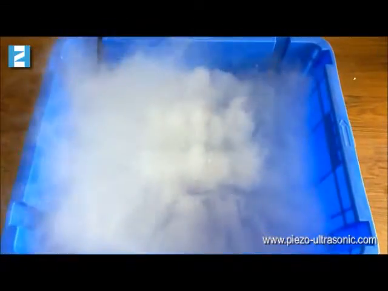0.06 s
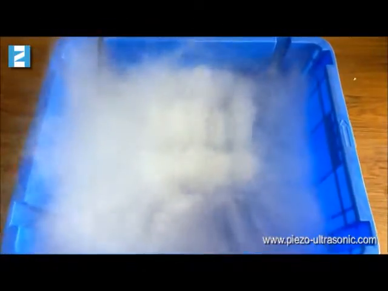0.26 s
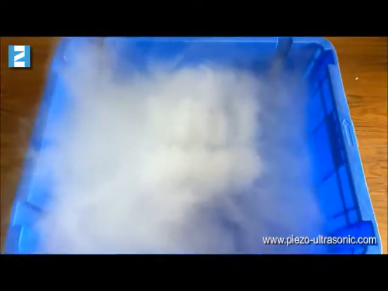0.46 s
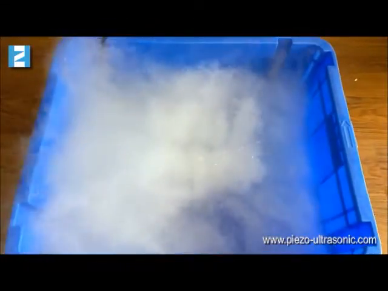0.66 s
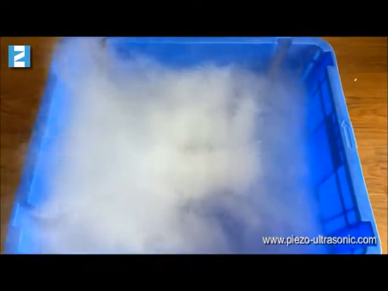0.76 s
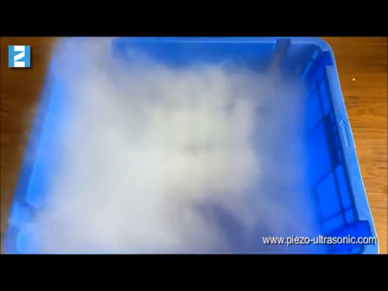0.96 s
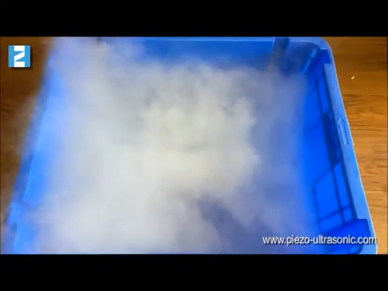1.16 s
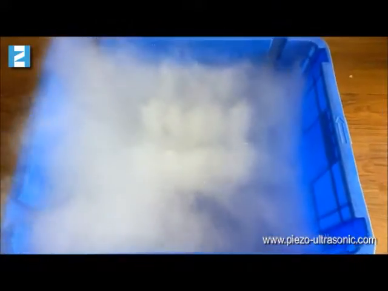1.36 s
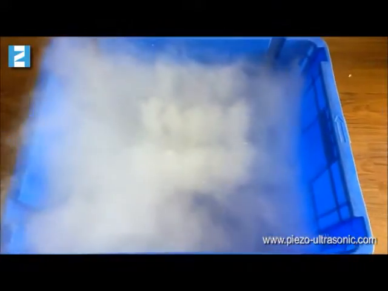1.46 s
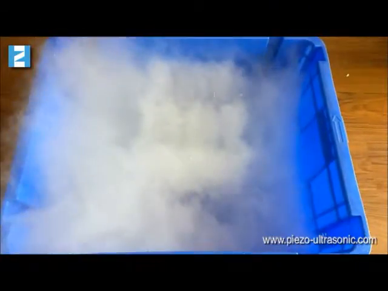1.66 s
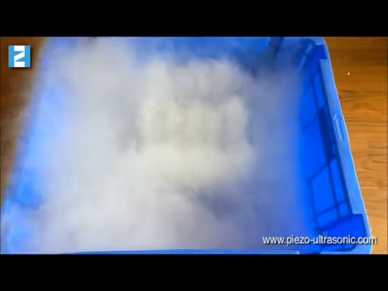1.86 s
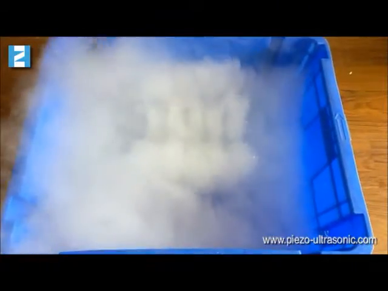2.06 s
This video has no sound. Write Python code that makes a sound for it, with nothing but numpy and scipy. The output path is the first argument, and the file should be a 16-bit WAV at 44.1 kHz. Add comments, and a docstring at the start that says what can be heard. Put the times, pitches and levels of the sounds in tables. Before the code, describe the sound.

A mist maker hisses softly and steadily in a plastic tub of water, close by in a small room. Fine spray and tiny bubbly drips patter throughout the two seconds, mostly on the left. At about 0.2 seconds one louder hollow knock briefly rings the tub. A soft low rumble swells to around 0.8 seconds and fades. Sharper drips stand out near 0.6, 0.9 and 1.7 seconds.

```python
"""An ultrasonic mist maker hisses in a plastic tub of water, close to a stereo microphone in a small room.
Droplets from its fountains fall back, mostly on the left, and ring as tiny rising bubbles
over a fine patter of spray. The tub takes one hollow knock that sets its walls ringing,
and a soft low rumble follows."""
import sys
import numpy as np
from scipy import signal
from scipy.fft import rfft, irfft
from scipy.io import wavfile

SR = 44100
rng = np.random.default_rng(int(sys.argv[2]) if len(sys.argv) > 2 else 0)


def store_wav(level_fs):
    """Save 16-bit WAV to argv[1]."""
    pcm = np.round(np.clip(np.atleast_2d(level_fs), -1, 1) * 32767)
    wavfile.write(sys.argv[1], SR, pcm.T.astype(np.int16))


N = 92610
T = np.arange(N) / SR
FFT_HZ = np.arange(N // 2 + 1) * SR / N

# Pan is left minus right at the microphone. Spectra give only the shape, as level per hertz.
HISS_SPECTRUM = [(120, -11), (200, -4.5), (490, -21), (557, -18), (929, -9), (1160, -15.5), (1270, -9.5),
                 (2040, -10), (2680, -13.5), (3050, -10), (4080, -6.5), (6690, -9.5), (15800, -6)]   # the mister: f/Hz, level/dB
HISS_BALANCE = [(300, 1), (1000, 1.5), (2200, -5), (4000, 12), (6500, 8.5), (8500, 12.5), (11000, 13),
                (13500, 9), (15500, 10)]   # where its hiss sits: f/Hz, pan/dB
WASH_SPECTRUM = [(1200, -13.5), (1800, -13.5), (2250, -2.5), (2900, -16), (4500, -18), (8000, -20.5),
                 (15000, -17.5)]   # stirred water: f/Hz, level/dB
WASH_SWELL = [(0, -70), (.4, -60.5), (.6, -70), (.8, -61), (1.0, -61), (1.2, -64), (1.5, -76), (2.1, -69.5)]   # its rise and fall: t/s, level/dB
DROP_BUBBLES = [(0.0229, 3700, -38, 13), (.175, 12200, -43.5, 21), (0.186, 4980, -42.5, 19),
                (0.445, 3940, -46, 1), (.451, 1870, -46, -2), (.460, 5700, -52, 0), (0.473, 1060, -55, 0),
                (0.481, 2720, -50, 2), (.517, 1578, -42.5, -12), (.529, 5100, -48, 19),
                (.551, 5200, -47, 4), (.602, 4440, -48, 23), (.632, 8570, -38.5, 10),
                (.761, 7950, -46.5, 15), (.801, 5500, -50, 22), (0.896, 3060, -47, 16),
                (.899, 4770, -51, -9), (.929, 4950, -35.5, 22), (0.941, 1085, -49, 7),
                (.953, 1256, -40, -3), (0.978, 5770, -43, 15), (0.998, 1150, -52, 6),
                (1.002, 726, -56.5, 4), (1.037, 787, -50.5, 8), (1.063, 3770, -43, 25),
                (1.102, 4780, -41, 16), (1.113, 3500, -44, 17), (1.115, 2300, -41.5, -14),
                (1.210, 8040, -44.5, 20), (1.264, 3380, -46, 21), (1.279, 1773, -49, -20),
                (1.292, 6500, -43.5, 22), (1.378, 2470, -54, -17), (1.396, 1206, -54.5, -5),
                (1.443, 6800, -49, 18), (1.494, 3250, -47, 17), (1.503, 2630, -49.5, 18),
                (1.596, 1306, -55.5, 0), (1.614, 8250, -43, 22), (1.6405, 3570, -32.5, 31),
                (1.68, 1290, -56.5, -1), (1.699, 10100, -46, 14), (1.725, 2175, -44.5, -10),
                (1.7318, 3430, -39, 9), (1.744, 8450, -44, 15), (1.753, 4360, -42.5, 10),
                (1.768, 794, -54.5, 5), (1.883, 3120, -52.5, 18), (1.887, 1770, -55.5, -1),
                (1.92, 2560, -46.5, 21), (1.983, 2660, -51, 14)]   # bubbles under falling droplets: t/s, f/Hz, peak level/dB, pan/dB
DROP_TICKS = [(0.0222, -34, 5), (0.6124, -31.5, 7), (.7615, -44, 14), (.929, -30.5, 13),
              (1.1127, -33.5, 18), (1.495, -44, 10), (1.7314, -33, 14)]   # drops hitting the surface: t/s, peak level/dB, pan/dB
KNOCK_CONTACTS = [(0.2073, -16.5), (0.2127, -1.5), (0.2147, -3.5), (0.2205, -1), (0.22, -3.5)]   # contacts within the knock: t/s, relative level/dB
WALL_SPECTRUM = [(53, -55), (90, -25.5), (494, -14), (574, -10), (776, -16), (1650, -3), (2050, -7.5),
                 (2280, -4.5), (3150, -18.5), (3510, -10), (4740, -18), (6690, -18.5), (7610, -26),
                 (11000, -21.5), (15500, -33)]   # the tub's dense wall modes: f/Hz, level/dB
WALL_BALANCE = [(60, -4), (130, 4), (290, 2.5), (640, -2.5), (1410, -2), (3100, 0), (6820, 0.5), (15000, 7)]   # where they sit: f/Hz, pan/dB
WALL_DECAY = [(150, 0.4), (500, 0.25), (1000, 0.39), (1700, .3), (3500, 0.25), (7000, 0.34), (14000, 0.23)]   # how long they ring: f/Hz, T60/s
TUB_MODES = [(584, -52.5, 0.19, -14), (958, -53, .25, -6), (1245, -49, 0.32, -3), (1325, -39.5, 0.26, 5),
             (1380, -44, 0.25, -6), (1462, -50, 0.26, 1), (1634, -43, .36, -5), (1697, -40, 0.39, -10),
             (1940, -43, 0.22, -12.5), (2275, -42, .26, -13), (2602, -54, 0.34, 4)]   # distinct tub tones: f/Hz, level for a 0 dB contact/dB, T60/s, pan/dB
RUMBLE_SPECTRUM = [(12, -24), (20, 4), (41, 9), (92, -14), (125, -11), (252, -18.5), (307, -15.5),
                   (349, -26.5), (445, -17), (600, -31), (780, -41), (1320, -120)]   # low rumble: f/Hz, level/dB
RUMBLE_SWELL = [(0.0, -77.5, -72), (0.78, -58.5, -66.5), (2.1, -73.5, -81)]   # its rise and fall: t/s, deep level/dB, upper level/dB
STEREO_LIKENESS = [(30, 1), (100, 0.96), (200, 0.92), (400, 0.067), (700, -0.17), (1500, -0.065),
                   (15000, 0.016)]   # noise across the microphone's two sides: f/Hz, correlation
ROOM_GAIN = [(500, -6), (1200, -3.5), (2200, 3), (4000, -3), (7000, 0.5), (14000, -19.5)]   # reflections of the drops and spray: f/Hz, gain/dB
ROOM_BALANCE = [(700, 5), (1500, -5), (2300, -5), (4000, 4.5), (10000, 9)]   # where they sit: f/Hz, pan/dB

HISS_DB = -58
BUBBLE_ATTACK_CYCLES, BUBBLE_LIFE_CYCLES = 0.61, 9.9
BUBBLE_RISE = 0.045   # share of the pitch gained after one life
SPRAY_PER_S, SPRAY_MIN_DB, SPRAY_SPREAD_DB, SPRAY_MAX_PAN_DB = 75, -57.5, 3.5, 59
SPRAY_LOW_HZ, SPRAY_HIGH_HZ = 2612, 10850
TICK_DECAY_S, TICK_LOW_HZ = 0.00032, 2600
WALL_DB, WALL_TAIL_GAIN_DB, WALL_TAIL_T60_S = -32.5, -19.5, 0.39
CRACK_GAIN_DB, CRACK_DECAY_S = -29, 0.0014
RUMBLE_SPLIT_HZ, CUTOFF_HZ = 90, 15900
ROOM_T60_S, ROOM_DELAY_S = 0.28, 0.0023


def from_db(db):
    """Decibels to gain."""
    return 10 ** (np.asarray(db) / 20)


def unit_rms(x):
    """Scale to an rms of 1."""
    return x / np.sqrt(np.mean(x ** 2) + 1e-20)


def in_time(rows):
    """Each column of a curve at every sample."""
    times, *columns = np.transpose(rows)
    return [np.interp(T, times, column) for column in columns]


def at_hz(rows, hz):
    """Read a table on a log-frequency axis."""
    row_hz, values = np.transpose(rows)
    return np.interp(np.log(hz + 1e-9), np.log(row_hz), values)


def pan(db):
    """Left and right gains of constant power."""
    gains = from_db(np.array([[.5], [-.5]]) * db)
    return gains / np.sqrt(np.mean(gains ** 2, axis=0))


def add(out, start_s, sound):
    """Mix a sound in at a time."""
    i = int(np.clip(start_s * SR, 0, N - 1))
    out[..., i:i + sound.shape[-1]] += sound[..., :N - i]


def butter(x, hz, kind, order=2):
    """Butterworth filter."""
    return signal.sosfilt(signal.butter(order, hz, kind, fs=SR, output="sos"), x)


def noise(spectrum, balance=((1, 0),)):
    """Coloured stereo noise of rms 1, its bass alike on both sides of the microphone."""
    mid, side = rfft(rng.standard_normal((2, N)))
    alike = at_hz(STEREO_LIKENESS, FFT_HZ)
    stereo = np.sqrt(1 + alike) * mid + np.sqrt(1 - alike) * side * [[1], [-1]]
    colour = from_db(at_hz(spectrum, FFT_HZ)) * pan(at_hz(balance, FFT_HZ))
    return unit_rms(irfft(stereo * colour, N))


def mister_hiss():
    """The mister hisses steadily close by, its treble to the left."""
    return from_db(HISS_DB) * noise(HISS_SPECTRUM, HISS_BALANCE)


def water_wash():
    """Stirred water washes faintly in the tub."""
    level_db, = in_time(WASH_SWELL)
    return from_db(level_db) * noise(WASH_SPECTRUM)


def bubble(hz):
    """A trapped bubble rings briefly, its pitch rising ever faster as it nears the surface."""
    cycles = np.arange(int(3 * BUBBLE_LIFE_CYCLES * SR / hz)) * hz / SR
    age = cycles / BUBBLE_LIFE_CYCLES
    envelope = (1 - np.exp(-cycles / BUBBLE_ATTACK_CYCLES)) * np.exp(-age)
    rising_hz = hz * (1 + BUBBLE_RISE * age ** 2)
    return envelope / envelope.max() * np.sin(2 * np.pi * np.cumsum(rising_hz) / SR)


def spray():
    """Fine spray lands at random, left of the microphone, and makes tiny high bubbles."""
    out = np.zeros((2, N))
    draws = rng.random(size=(500, 4))
    landings_s = np.cumsum(-np.log(draws[:, 0])) / SPRAY_PER_S
    for start_s, (pitch, size, place) in zip(landings_s, draws[:, 1:]):
        if start_s < T[-1]:
            db = SPRAY_MIN_DB + SPRAY_SPREAD_DB * min(-np.log(size), 3)
            hz = SPRAY_LOW_HZ * (SPRAY_HIGH_HZ / SPRAY_LOW_HZ) ** pitch
            add(out, start_s, from_db(db) * pan(place * SPRAY_MAX_PAN_DB) * bubble(hz))
    return out


def drops():
    """Larger droplets fall back and trap bubbles; a few tick sharply on the surface."""
    out = np.zeros((2, N))
    for start_s, hz, db, pan_db in DROP_BUBBLES:
        add(out, start_s, from_db(db) * pan(pan_db) * bubble(hz))
    t = T[:SR // 100]
    for start_s, db, pan_db in DROP_TICKS:
        burst = rng.standard_normal(len(t)) * np.exp(-t / TICK_DECAY_S)
        tick = butter(burst, TICK_LOW_HZ, "high")
        add(out, start_s, from_db(db) * pan(pan_db) * tick / np.abs(tick).max())
    return out


def ring_down(t60):
    """Envelope of the tub's ringing: each contact adds energy, which then dies away."""
    energy = np.zeros(N)
    for start_s, db in KNOCK_CONTACTS:
        fall_db = 60 * np.clip(T - start_s, 0, 2 * t60) / t60
        energy += (T >= start_s) * from_db(db - fall_db) ** 2
    return np.sqrt(energy)


def tub_knock():
    """A quick run of contacts: each cracks and feeds the dense wall modes; a few tones ring out."""
    out = np.zeros((2, N))
    walls = rfft(noise(WALL_SPECTRUM, WALL_BALANCE))
    tail = from_db(WALL_TAIL_GAIN_DB) * ring_down(WALL_TAIL_T60_S)
    octaves_hz = 60 * 2. ** np.arange(10)
    for low, high in zip(octaves_hz, octaves_hz[1:]):
        band = irfft(walls * ((FFT_HZ >= low) & (FFT_HZ < high)), N)
        t60 = at_hz(WALL_DECAY, np.sqrt(low * high))
        out += from_db(WALL_DB) * band * (ring_down(t60) + tail)
    for hz, db, t60, pan_db in TUB_MODES:
        tone = np.sin(2 * np.pi * (hz * T + rng.random((2, 1))))
        out += from_db(db) * pan(pan_db) * ring_down(t60) * tone
    crack_decay = np.exp(-np.minimum(T / CRACK_DECAY_S, 20))
    for start_s, db in KNOCK_CONTACTS:
        crack = butter(rng.standard_normal((2, N)), hz=9000, kind="low", order=1) * crack_decay
        add(out, start_s, from_db(CRACK_GAIN_DB + db) * pan(db=13) * crack)
    return out


def rumble():
    """A soft low rumble swells to its peak after the knock and fades."""
    bass = noise(RUMBLE_SPECTRUM)
    deep = unit_rms(butter(bass, RUMBLE_SPLIT_HZ, "low", order=4))
    upper = unit_rms(butter(bass, RUMBLE_SPLIT_HZ, "high", order=4))
    deep_db, upper_db = in_time(RUMBLE_SWELL)
    return from_db(deep_db) * deep + from_db(upper_db) * upper


def room(x):
    """Diffuse reflections from the tub and the near walls, different on each side of the microphone."""
    t = T[:SR // 2]
    tail = rng.standard_normal((2, len(t))) * from_db(-60 * t / ROOM_T60_S) * (t > ROOM_DELAY_S)
    tail /= np.sqrt(np.sum(tail ** 2, axis=1, keepdims=True))
    hz = np.arange(N + 1) * SR / (2 * N)
    colour = from_db(at_hz(ROOM_GAIN, hz)) * pan(at_hz(ROOM_BALANCE, hz))
    return irfft(rfft(x.mean(axis=0), 2 * N) * rfft(tail, 2 * N) * colour)[:, :N]


def scene():
    """Everything as heard beside the tub; only the drops and spray feed the room's reflections."""
    patter = drops() + spray()
    return patter + room(patter) + tub_knock() + mister_hiss() + water_wash() + rumble()


def record(dry):
    """The microphone chain cuts the top treble steeply."""
    lowpass = signal.ellip(N=12, rp=.1, rs=80, Wn=CUTOFF_HZ, fs=SR, output="sos")
    return signal.sosfilt(lowpass, dry)


dry = scene()
out = record(dry)
store_wav(out)
```